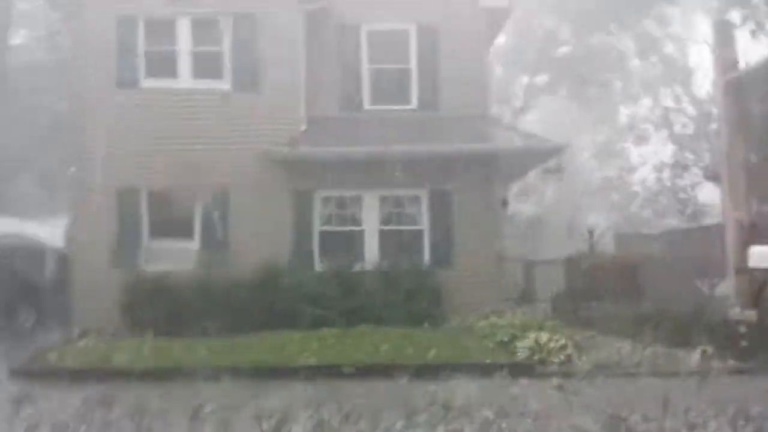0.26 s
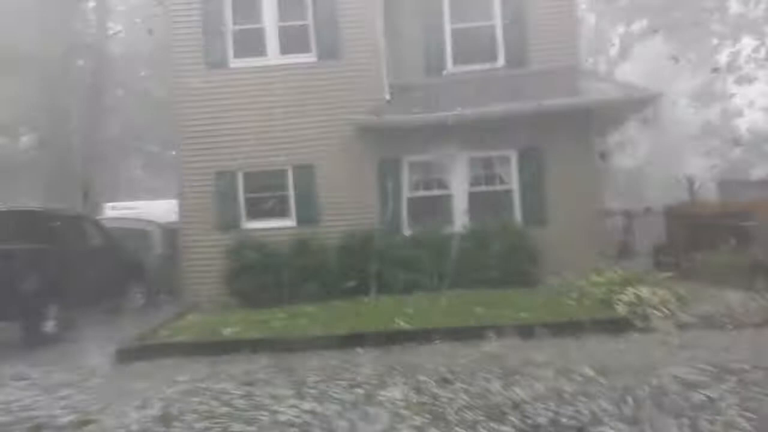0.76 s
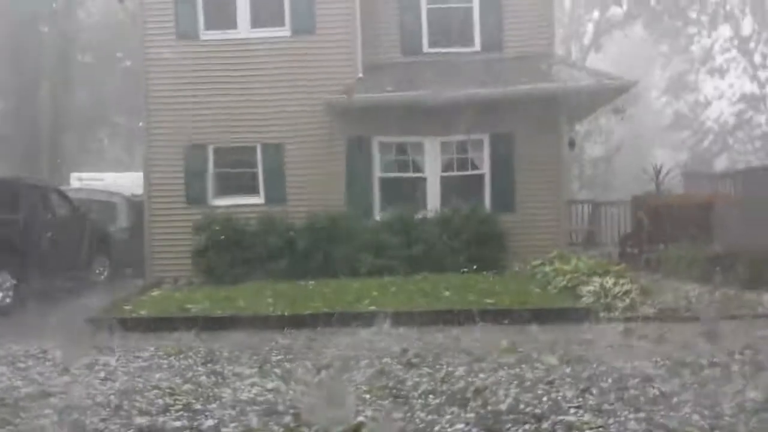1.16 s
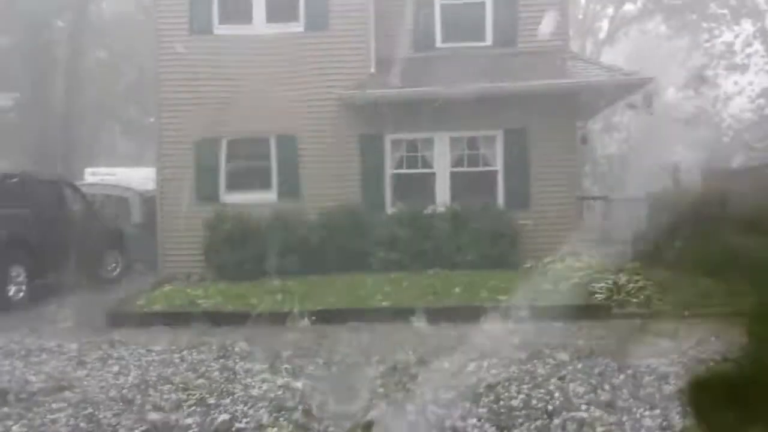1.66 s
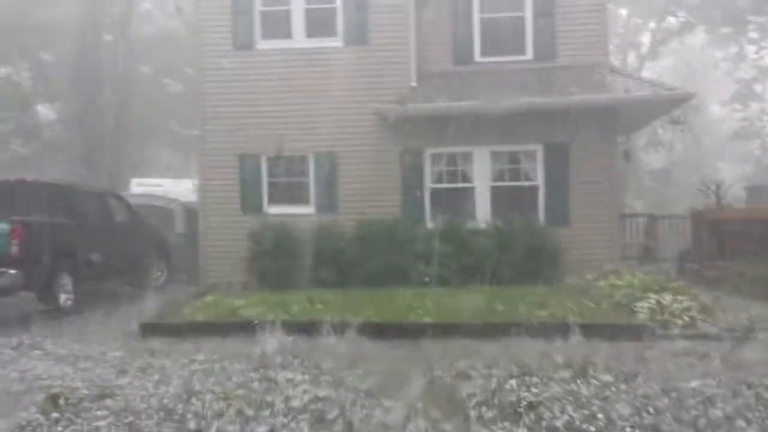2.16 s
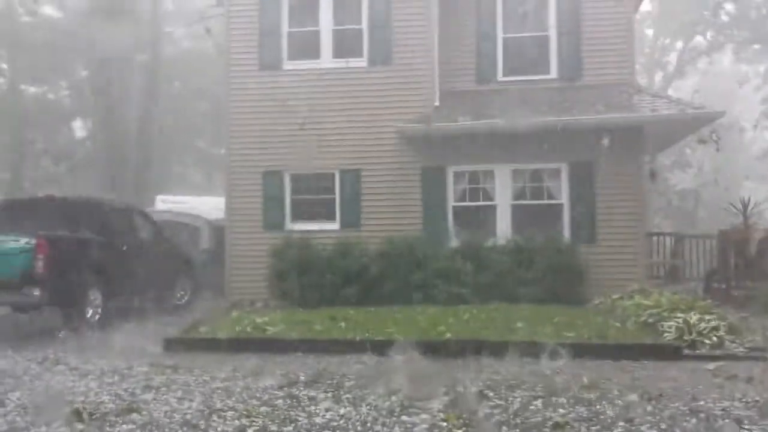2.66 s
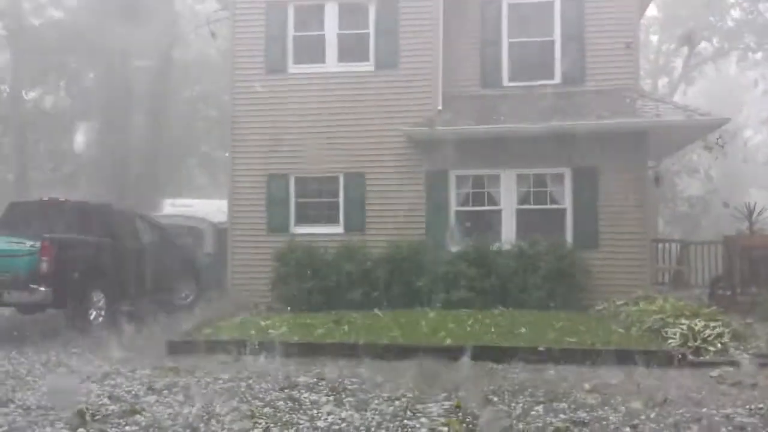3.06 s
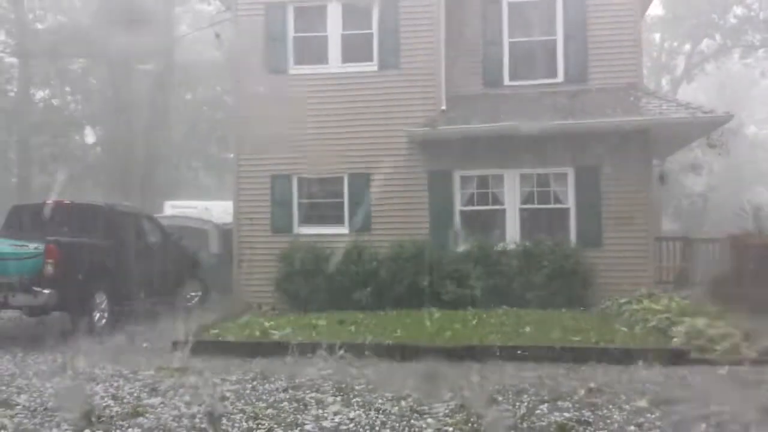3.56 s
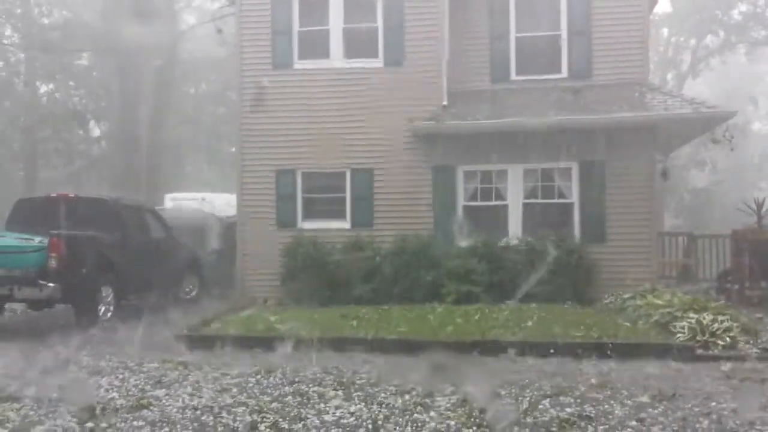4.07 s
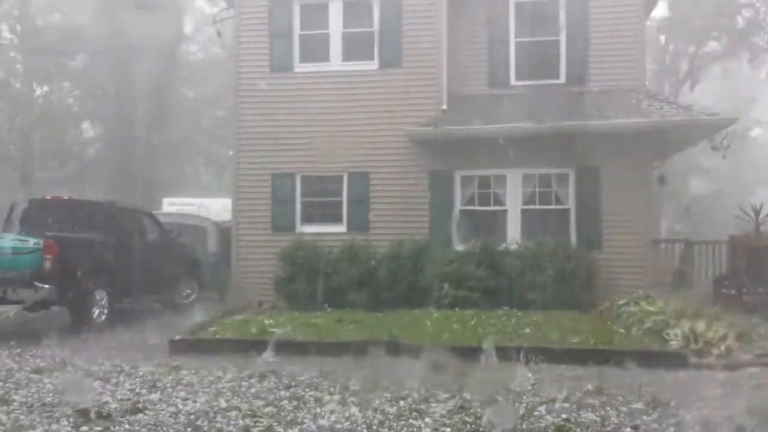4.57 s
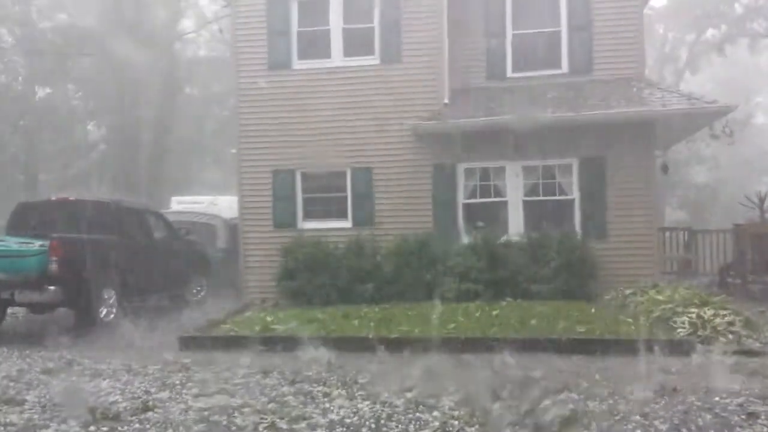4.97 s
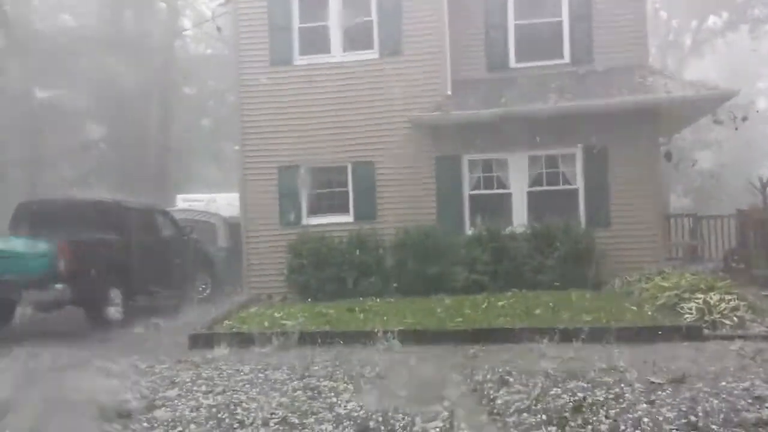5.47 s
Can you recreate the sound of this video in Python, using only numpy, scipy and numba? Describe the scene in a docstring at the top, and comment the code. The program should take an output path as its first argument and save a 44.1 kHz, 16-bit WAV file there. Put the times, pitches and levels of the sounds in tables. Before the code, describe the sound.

Heard from inside a parked car in a hailstorm: dull thuds on sheet metal, bright cracks on glass and trim, occasional hollow pitched knocks and very dry snaps on the nearest pane. Blows come irregularly, many per second, from start to end, over a low steady rain roar. A close phone microphone slightly overloads on the loudest hits.

```python
"""A low roar of heavy rain is there from the start, and at once hail thuds on a parked car.
A phone inside hears the panels thud, glass and trim crack, hollow parts knock and the nearest pane snap.
Each blow is a handful of decaying modes, strongest near the pitch of the struck spot;
lesser stones patter at random. The rain is shaped noise, and the loudest blows overload the microphone."""
import sys
import numpy as np
from scipy import signal
from scipy.fft import rfft, irfft
from scipy.io import wavfile
from scipy.ndimage import uniform_filter1d
from numba import njit

SR = 44100
rng = np.random.default_rng(int(sys.argv[2]) if len(sys.argv) > 2 else 0)


def voltage_ratio(decibels):
    """Convert decibels (scalar or array-like) to amplitude ratios, 20 dB per decade."""
    exponent = np.asarray(decibels, float) / 20
    return 10 ** exponent


def wrap_up_sound(samples):
    """Save the sound to the file named by the first command line argument, as 16-bit audio."""
    columns = np.atleast_2d(samples).T
    # keep every value between -1 and 1, then stretch to whole-number steps
    tamed = np.clip(columns, -1, 1)
    steps = np.round(tamed * 32767).astype(np.int16)
    wavfile.write(sys.argv[1], SR, steps)


N = 251811  # samples, about 5.7 s
TOP_HZ = 14600  # upper limit of the rain and of the microphone


def curve(table, hz):
    """Read a table on a log-frequency axis."""
    points, values = np.transpose(table)
    return np.interp(np.log(hz), np.log(points), values)


# level difference between the phone's two microphone ports, left minus right: [f/Hz, level/dB]
PORT_BALANCE = [(100, 2.1), (500, 3.4), (1260, 6), (2500, 1.4), (5500, 4.5), (9000, -2), (14000, 0.9)]
# how alike the two ports hear the sound: [f/Hz, likeness 0-1]
PORT_LIKENESS = [(30, 0.65), (200, 0.98), (600, 0.67), (1500, 0.55), (6000, 0.033)]


def ports(hz, first, second):
    """The two ports share one part of the sound, late on the right; the rest is unrelated between them."""
    like = np.clip(curve(PORT_LIKENESS, hz), 0, 1)
    unlike = np.sqrt(1 - like ** 2)
    tilt = voltage_ratio(curve(PORT_BALANCE, hz) / 2)
    # long waves wrap round the phone and press on both ports at once
    lag_s = 0.00042 / (1 + (900 / hz) ** 8)
    late = first * np.exp(-2j * np.pi * hz * lag_s)
    left = first * tilt
    right = (like * late + unlike * second) / tilt
    return np.array([left, right])


# spectrum of the rain heard from inside, shape only: [f/Hz, relative level/dB]
RAIN_SPECTRUM = [(25, -30), (130, -6), (600, -8), (1300, -18.5), (3000, -29), (6000, -21.5), (10000, -34),
                 (13000, -40)]


def rain():
    """Dense drops of very uneven size run together into a roar whose level wavers a little."""
    drop_size = voltage_ratio(5.0 * rng.standard_normal(N))
    drops = rng.standard_normal((2, N)) * drop_size
    hz = np.maximum(np.fft.rfftfreq(N, 1 / SR), 1)
    heard = ports(hz, *rfft(drops))
    roar = irfft(heard * voltage_ratio(curve(RAIN_SPECTRUM, hz)) * (hz < TOP_HZ), N)
    # random level steps of 2000 samples, smoothed into slopes
    steps = np.repeat(rng.standard_normal(N // 2000 + 1), 2000)
    swell = uniform_filter1d(steps, 2000)[:N]
    return roar * voltage_ratio(-31 + 2.0 * swell) / roar.std()


def patter(top_db, low_hz, count):
    """Lesser and farther stones at random moments, most near the top level, some much fainter, over two octaves."""
    moment, strength, pitch = rng.random((count, 3)).T
    return np.transpose([moment * N / SR, top_db + 14 * np.log10(strength), low_hz * 4 ** pitch])


@njit
def ring(start, rise, pole, left, right, faint, size):
    """Each mode swells in within a cycle, at its own moment, and rings down until it is too faint to hear."""
    out = np.zeros((2, size))
    for m in range(len(pole)):
        a, b, p, gap = left[m], right[m], pole[m], 1.
        steps = int(np.log(faint / (abs(a) + abs(b) + faint)) / np.log(abs(p)))
        for i in range(start[m], min(start[m] + steps, size)):
            out[0, i] += a.imag * (1 - gap)
            out[1, i] += b.imag * (1 - gap)
            a, b, gap = a * p, b * p, gap * rise[m]
    return out


# longest ring of the car body's modes, before each surface's damping: [f/Hz, 60 dB decay t/s]
BODY_DECAY = [(40, 0.29), (260, 0.19), (700, 0.23), (1800, 0.13), (6000, 0.11), (15000, 0.067)]


def blows(stones, body, top_hz, mode_db, spot_db, spot_octaves, spread_s, scatter, damp, count):
    """The body's modes are crowded; every blow stirs a different handful of them."""
    s, level_db, spot_hz = np.transpose(stones)[:, :, None]
    place = (np.arange(count) + rng.random((len(s), count))) / count
    hz = 30 + top_hz * place ** 1.5
    chance = rng.standard_normal((len(s), 6, count)).transpose(1, 0, 2)
    # many modes die early: a snap, then a tail
    t60 = curve(BODY_DECAY, hz) / damp * np.exp(-scatter * np.abs(chance[0]))
    # the struck spot favours modes near its own pitch
    near_db = spot_db * np.exp(-(np.log2(hz / spot_hz) / spot_octaves) ** 2)
    size = voltage_ratio(level_db + mode_db + curve(body, hz) + near_db)
    shared = chance[1] + 1j * chance[2]
    unrelated = chance[3] + 1j * chance[4]
    left, right = size * ports(hz, shared, unrelated)
    # bending waves are slower at low pitch, so the lows gather late
    late_s = spread_s * np.abs(chance[5]) * np.sqrt(1000 / hz)
    start = ((s + late_s) * SR).astype(np.int64)
    rise = np.exp(-2 * hz / SR)
    pole = np.exp((2j * np.pi * hz - np.log(1000) / t60) / SR)
    return ring(start.ravel(), rise.ravel(), pole.ravel(), left.ravel(), right.ravel(), 4e-4, N)


# stones on the metal panels: [t/s, relative level/dB, f/Hz of the struck spot]
THUD_STONES = [(0.018, -12, 310), (0.0342, -13.5, 310), (0.2129, -6, 530), (0.254, -9.5, 308),
               (0.421, -9.5, 313), (0.5057, -4.5, 646), (0.6081, -9, 605), (0.6646, 0.5, 920),
               (0.7735, -13, 1110), (0.8301, -5, 755), (0.8739, -1, 760), (0.9856, 0.5, 645),
               (1.257, -6.5, 1050), (1.2743, -7, 880), (1.3492, -2, 570), (1.4064, -11.5, 550),
               (1.4601, -14.5, 335), (1.5207, -14, 755), (1.5483, -9, 734), (1.5954, -3, 930),
               (1.6827, -7, 1010), (1.708, -5, 600), (1.789, -5.5, 800), (1.874, 0, 790),
               (2.0274, -2.5, 690), (2.1171, -4.5, 960), (2.261, -5, 750), (2.3544, -11, 705),
               (2.4157, -5.5, 730), (2.6193, -9.5, 634), (2.668, -17.5, 925), (2.79, -17, 200),
               (2.8274, -5.5, 680), (2.9173, -11, 355), (2.9628, -5, 690), (3.0221, -6, 650),
               (3.0576, -1, 665), (3.0972, -12.5, 345), (3.3294, -7.5, 915), (3.3533, -9, 780),
               (3.6316, 0.5, 560), (3.7076, -7, 716), (3.8246, -3.5, 860), (3.9959, -4.5, 750),
               (4.0893, -16, 970), (4.1358, -17, 714), (4.1746, -5, 800), (4.3239, -2.5, 696),
               (4.4207, -8.5, 830), (4.4519, -11, 600), (4.4731, -6.5, 880), (4.5877, -10.5, 670),
               (4.6262, -10, 547), (4.6497, -3, 710), (4.6889, -8, 585), (4.7939, 0.5, 620),
               (4.9109, -12, 870), (4.9891, -8.5, 935), (5.0651, -0.5, 770), (5.1051, -19.5, 695),
               (5.1398, -11.5, 1040), (5.1716, -14.5, 840), (5.376, -16, 550), (5.4166, -6, 870),
               (5.4602, -3, 680), (5.5388, -12, 830), (5.5834, -4, 640), (5.6183, -8.5, 1260)]
# what a blow stirs in the metal, thuds and knocks alike: [f/Hz, relative level per mode/dB]
PANEL_MODES = [(40, -50), (120, -6), (300, -0.5), (700, -4), (1400, -1.5), (2600, -9.5), (5000, -19.5)]


def thuds():
    """Dull blows on roof and doors stir mostly the low and middle modes of the sheet metal."""
    stones = np.vstack([THUD_STONES, patter(top_db=-18, low_hz=280, count=130)])
    return blows(stones, PANEL_MODES, 5000., mode_db=-22.5, spot_db=8.5, spot_octaves=0.76,
                 spread_s=0.003985, scatter=0.47, damp=0.96, count=240)


# stones on glass and trim: [t/s, relative level/dB, f/Hz of the struck spot]
CRACK_STONES = [(0.0388, -5, 5570), (0.1002, -15, 5860), (0.2145, -12, 4600), (0.2389, -12, 5240),
                (0.3485, -12, 5200), (0.4551, -14, 5140), (0.5084, -20.5, 3410), (0.5973, -19, 5720),
                (0.6769, -5.5, 4900), (0.7601, -15.5, 5660), (0.8394, -7, 4950), (0.876, -14, 3910),
                (0.8954, -11.5, 5210), (0.9614, -15, 4830), (1.0633, -13, 6300), (1.2178, -18, 6160),
                (1.26, -19, 2900), (1.2742, -10.5, 2660), (1.349, -14, 5070), (1.3665, -11, 4280),
                (1.4631, -18, 5180), (1.5316, -12, 4370), (1.6006, -8, 4500), (1.8305, -14.5, 5800),
                (1.8768, -14, 4010), (1.9043, -10.5, 5270), (1.9224, -8, 5500), (1.9993, -9.5, 5600),
                (2.0303, -9.5, 4700), (2.1409, -15, 5470), (2.2354, -16, 4000), (2.3376, -12, 4220),
                (2.3846, -10.5, 6460), (2.449, -9.5, 4040), (2.4891, -18, 5640), (2.561, -9.5, 6600),
                (2.6341, -21, 5950), (2.668, -26, 3460), (2.8674, -13.5, 4800), (3.0234, -8, 5300),
                (3.0593, -10, 4460), (3.1305, -11, 5550), (3.2087, -20, 5090), (3.3108, -16, 5940),
                (3.3302, -12.5, 5600), (3.4879, -5, 4350), (3.5539, -21, 4600), (3.6025, -14.5, 6700),
                (3.618, -14, 5500), (3.6351, -7.5, 4300), (3.759, -11.5, 5370), (3.8249, -13.5, 2800),
                (3.9401, -12, 6900), (4.1756, -11.5, 5740), (4.2042, -6.5, 6000), (4.335, -8, 6200),
                (4.4222, -14, 4550), (4.4528, -7.5, 3300), (4.6348, -13, 5800), (4.7935, -6.5, 3730),
                (4.9669, -16.5, 5470), (5.0671, -14.5, 3230), (5.1522, -10, 5960), (5.1607, -11, 5050),
                (5.174, -14.5, 5650), (5.3122, -18, 6200), (5.3321, -21, 4420), (5.4186, -14, 4800),
                (5.4638, -10.5, 4170), (5.4953, -16.5, 5430), (5.5287, -13, 5560), (5.376, -23, 5000),
                (5.6038, -7.5, 5200)]
# what a blow stirs in the glass: [f/Hz, relative level per mode/dB]
GLASS_MODES = [(200, -5), (1500, -8), (3000, -10), (5800, -2.5), (9000, -8), (14600, -19.5)]


def cracks():
    """Sharp blows on glass and trim stir modes far up the treble that die sooner than the metal's."""
    stones = np.vstack([CRACK_STONES, patter(top_db=-21, low_hz=2100, count=520)])
    return blows(stones, GLASS_MODES, TOP_HZ, mode_db=-21.5, spot_db=8.0, spot_octaves=0.88,
                 spread_s=0.002, scatter=0.54, damp=1.26, count=340)


# stones on a hollow part of the body: [t/s, relative level/dB, f/Hz of the note]
KNOCK_STONES = [(0.142, -13, 370), (0.4385, 2, 470), (1.0441, -2, 390), (2.3363, -3.5, 274),
                (2.5525, -8.5, 407), (3.4822, 2, 475), (3.5531, -4.5, 308), (3.7607, -1.5, 507),
                (5.0039, -3, 490), (5.3337, -2.5, 514)]


def knocks():
    """A hollow part answers with a clear note: its modes stand out strongly round one pitch."""
    return blows(KNOCK_STONES, PANEL_MODES, 5000., mode_db=-25, spot_db=14, spot_octaves=0.48,
                 spread_s=0.002975, scatter=0.43, damp=1.11, count=240)


# stones on the pane right by the phone: [t/s, relative level/dB, f/Hz of the struck spot]
SNAP_STONES = [(0.3058, -3, 6000), (0.4193, -7.5, 5730), (1.0927, -11.5, 5840), (1.1297, -8, 6500),
               (1.4077, -9, 5460), (1.5223, -1, 3330), (1.7896, -5, 4550), (2.4131, -1.5, 3200),
               (2.9189, -13, 5600), (2.992, -2.5, 5500), (3.0743, 1, 6100), (3.227, -4.5, 5530),
               (3.6858, -17.5, 5560), (4.0912, -17.5, 3220), (5.259, -3, 5200), (5.2756, -6, 6000),
               (5.5828, -7.5, 4330), (5.6788, -2, 5570)]
# what a blow stirs in that pane: [f/Hz, relative level per mode/dB]
PANE_MODES = [(40, -10), (150, -7), (1000, -8.5), (3000, -8), (5800, -5), (9000, -11.5), (14600, -16)]


def snaps():
    """The nearest pane sounds dry and sharp: its modes start almost together and die fastest."""
    return blows(SNAP_STONES, PANE_MODES, TOP_HZ, mode_db=-20.5, spot_db=8.5, spot_octaves=0.57,
                 spread_s=0.0004, scatter=0.74, damp=1.71, count=380)


def scene():
    """Hail on metal, glass and hollow parts, over rain."""
    return rain() + thuds() + cracks() + knocks() + snaps()


def band_limit(x):
    """A steep low-pass at the top of the band."""
    return signal.sosfilt(signal.butter(12, 14990, fs=SR, output="sos"), x)


def record(dry):
    """The phone's microphone drops the deep bass and the top, and flattens the loudest peaks."""
    band = signal.sosfilt(signal.butter(2, 70, "high", fs=SR, output="sos"), dry)
    knee = 3.2  # higher bends more abruptly into overload
    clipped = band / (1 + np.abs(band) ** knee) ** (1 / knee)
    rolled_off = signal.sosfilt(signal.butter(6, TOP_HZ, fs=SR, output="sos"), clipped)
    return band_limit(rolled_off)


dry = scene()
out = record(dry)
wrap_up_sound(out)
```